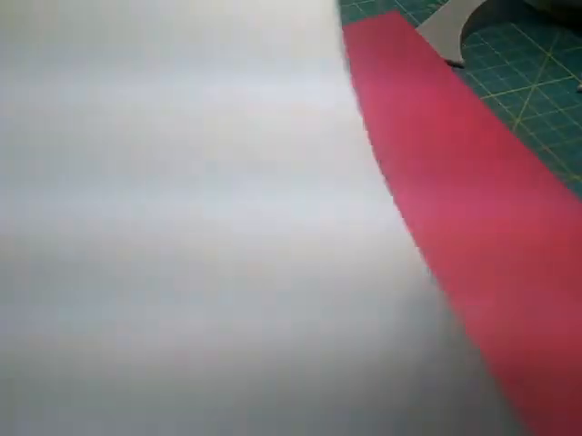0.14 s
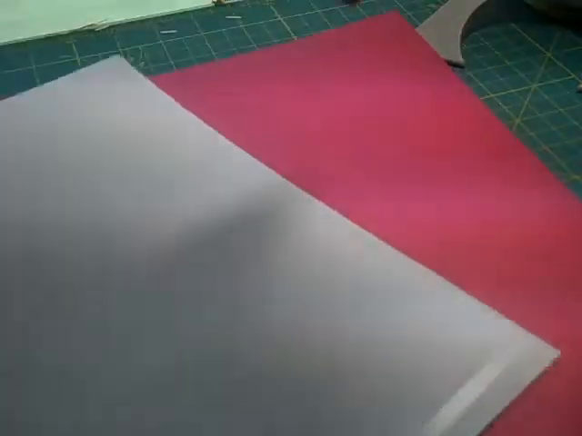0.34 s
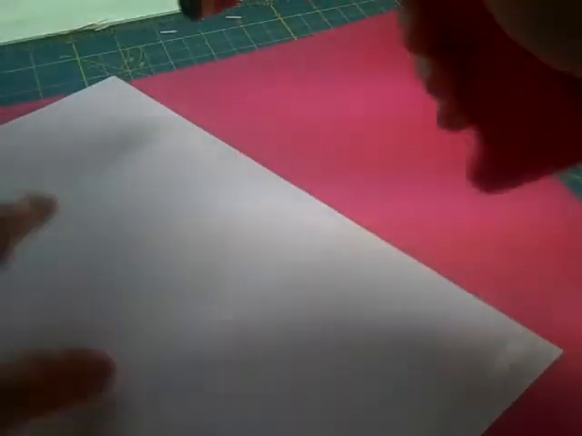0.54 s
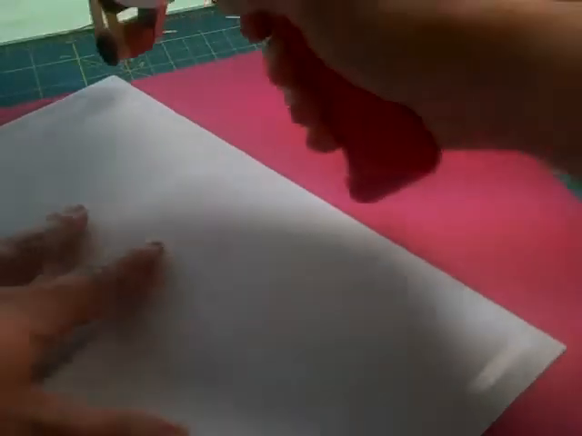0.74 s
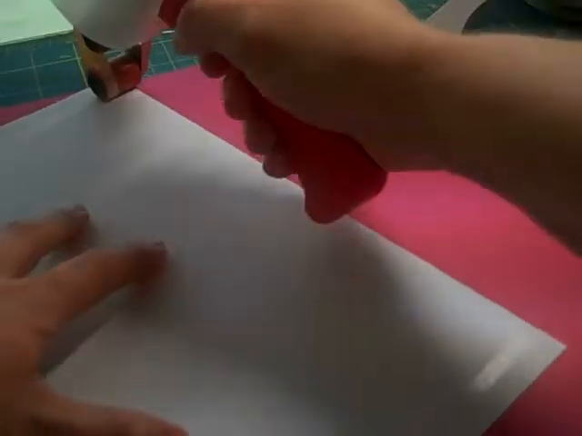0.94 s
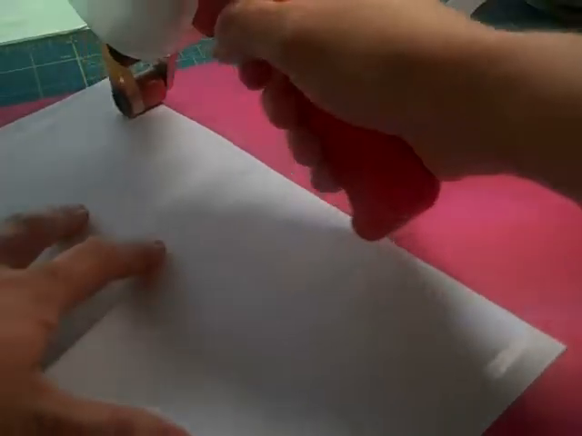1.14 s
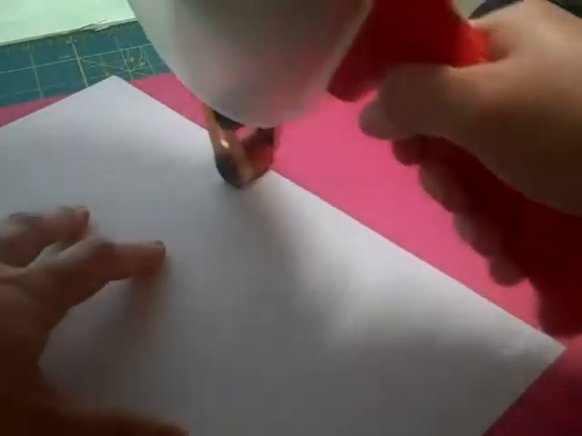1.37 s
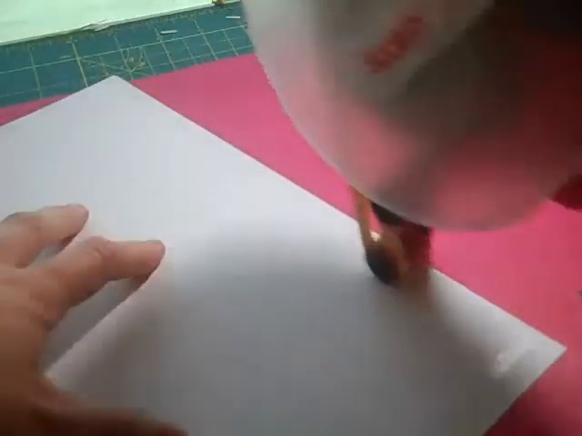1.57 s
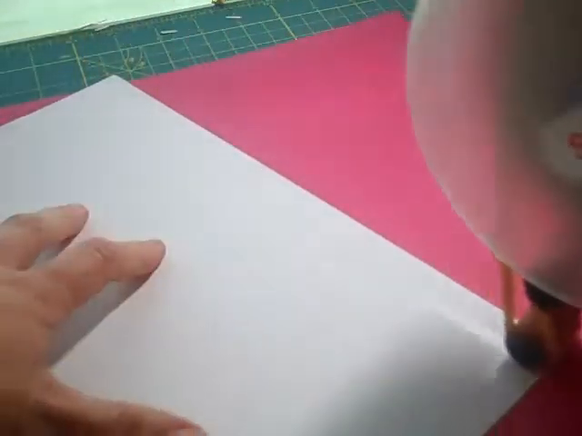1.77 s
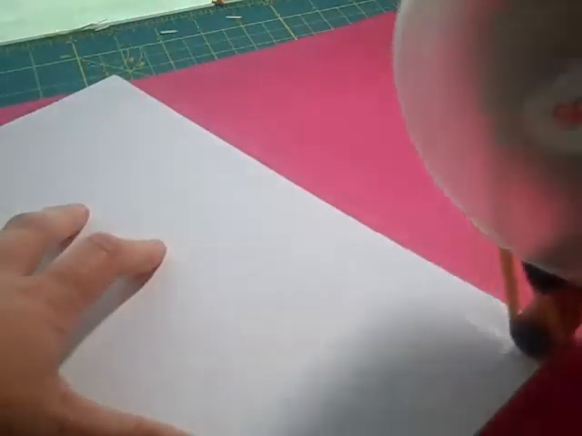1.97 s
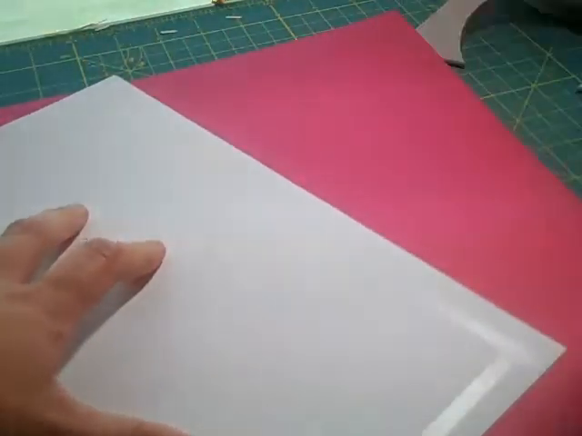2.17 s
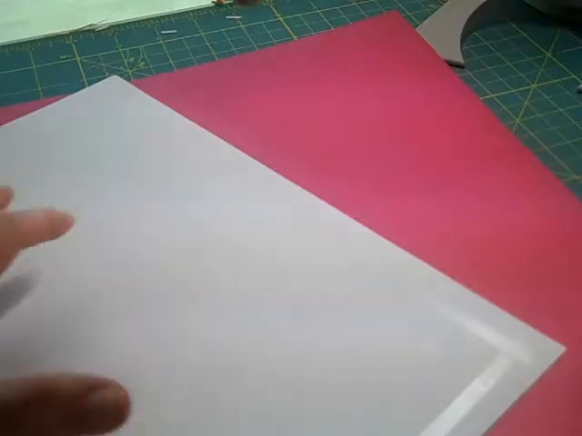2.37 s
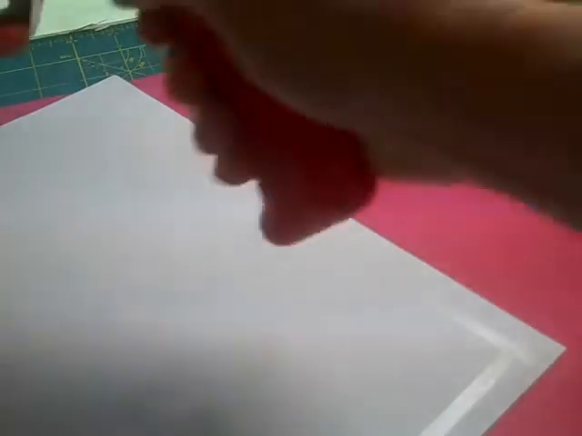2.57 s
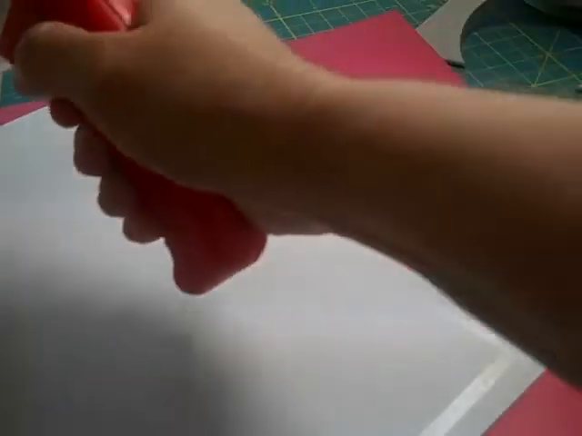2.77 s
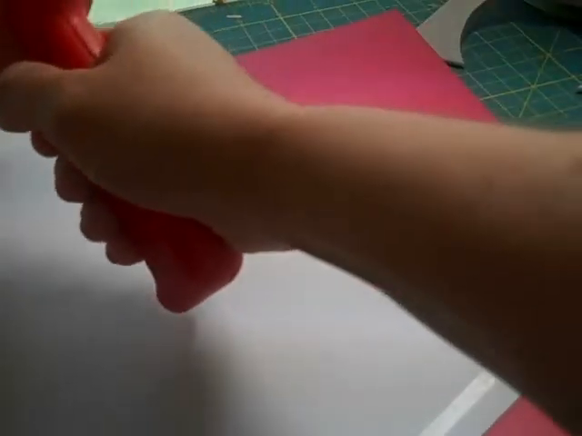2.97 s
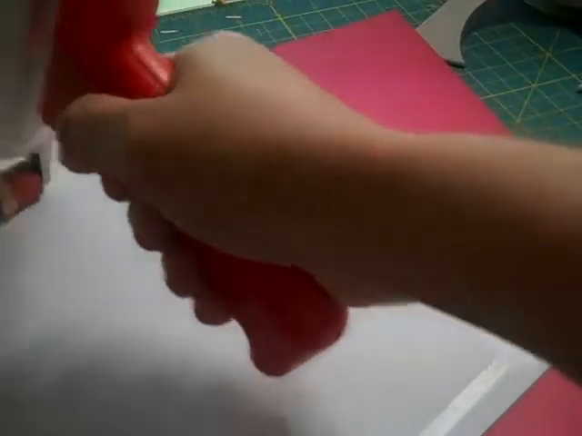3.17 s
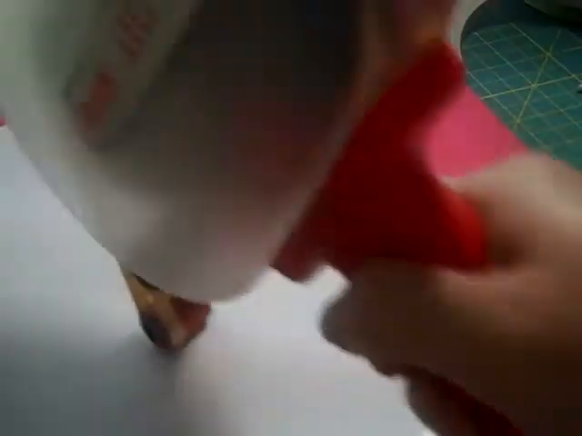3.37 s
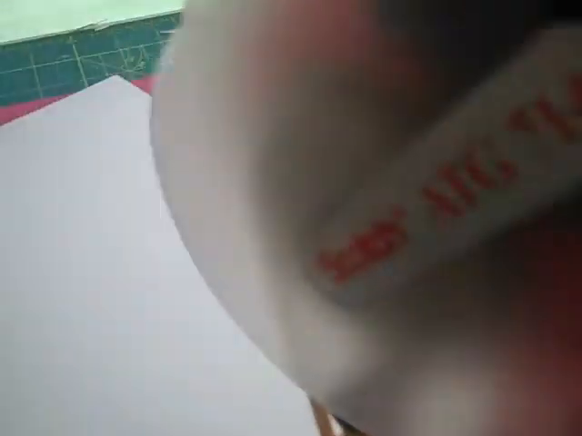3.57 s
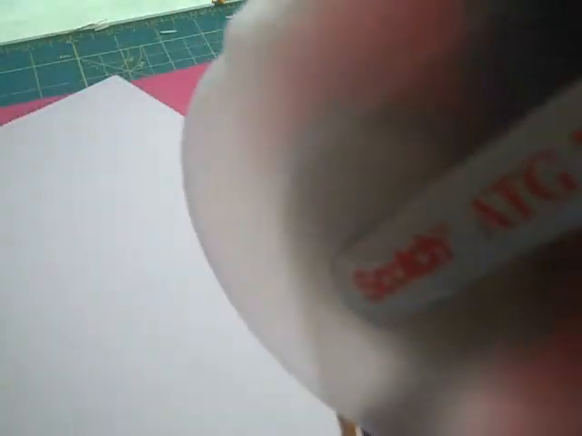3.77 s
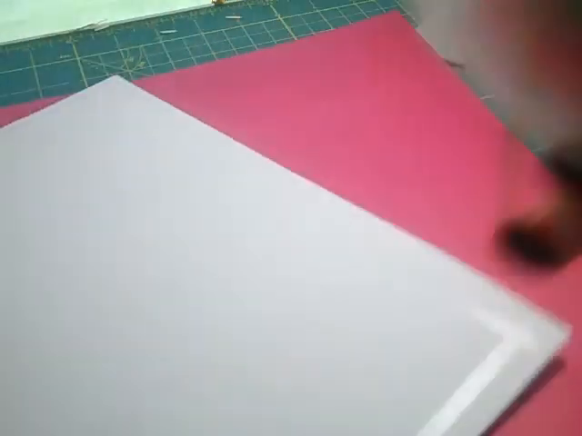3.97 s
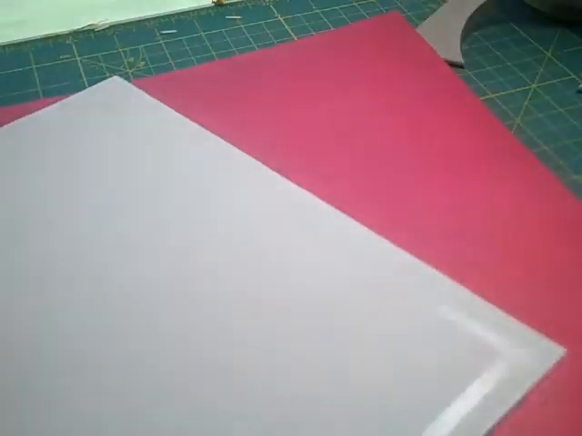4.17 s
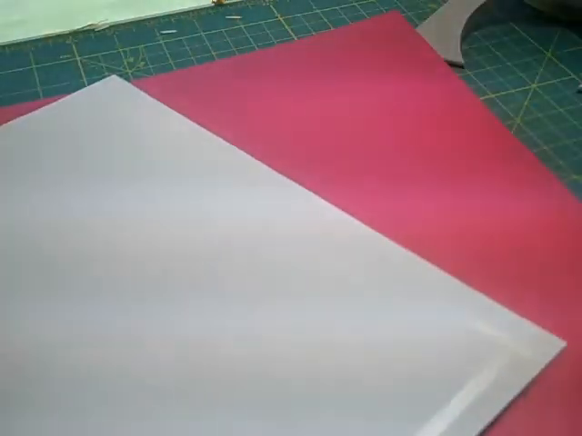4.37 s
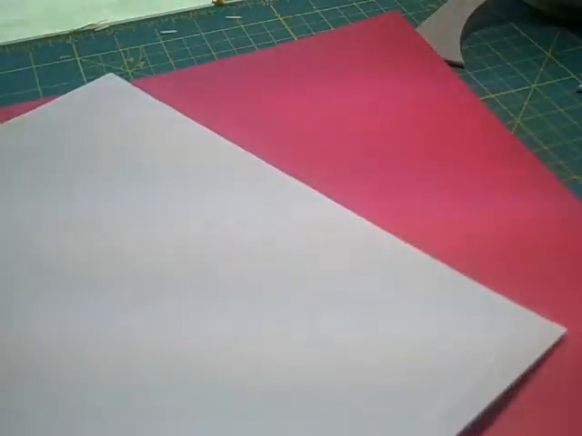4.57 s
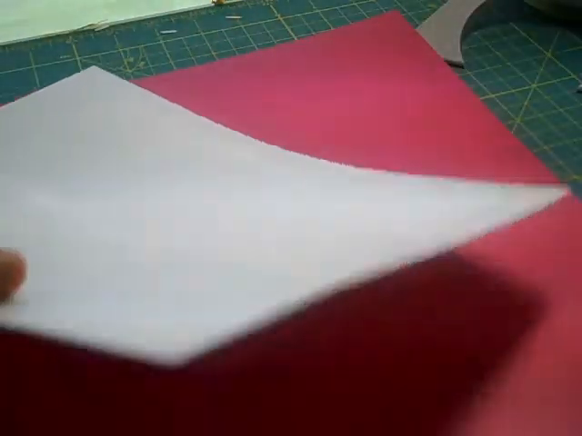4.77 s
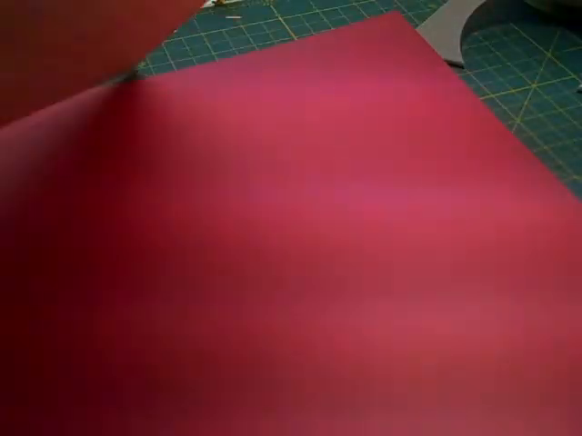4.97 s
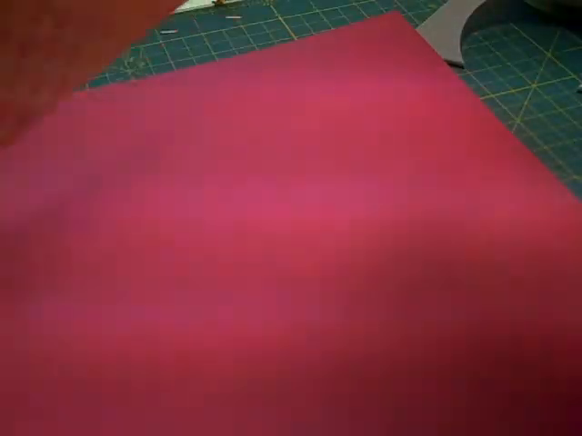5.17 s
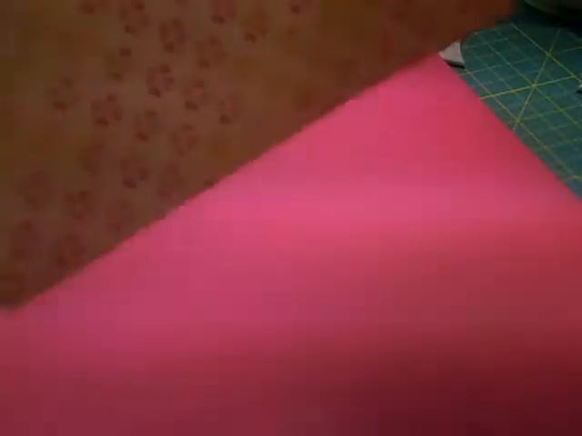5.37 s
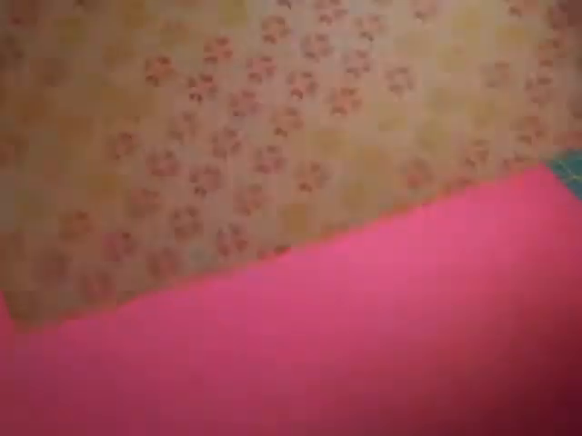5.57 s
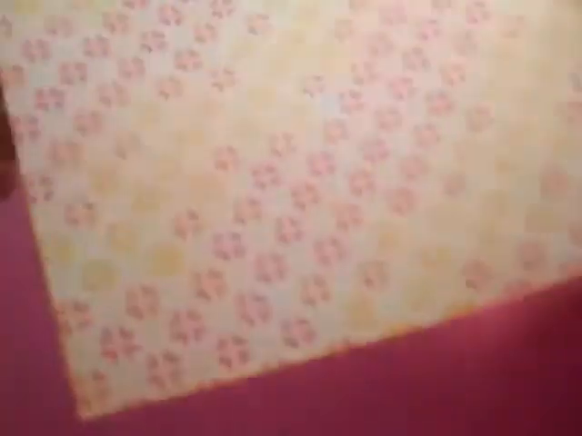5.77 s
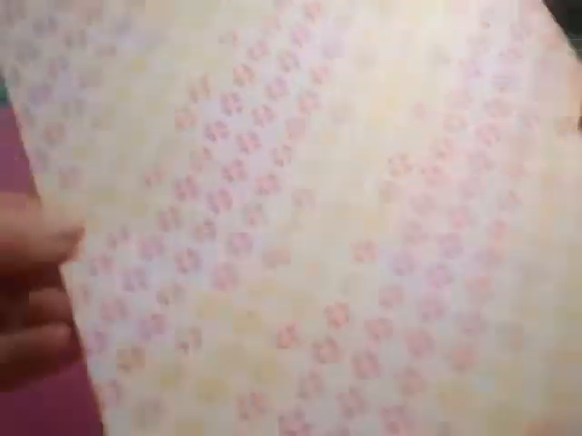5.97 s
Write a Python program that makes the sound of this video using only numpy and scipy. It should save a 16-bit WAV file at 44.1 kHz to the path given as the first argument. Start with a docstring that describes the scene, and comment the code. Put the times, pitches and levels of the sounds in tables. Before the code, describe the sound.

Two short strokes of a handheld tape applicator across paper are heard close up at a craft table. Each starts with a soft thud and trigger creak, rumbles and hisses as glue peels, and stops with a high squeal followed by plastic rattling. The paper slides and snaps before the strokes, then flexes and snaps louder after them. The small room is quiet apart from a faint, distant appliance hum.

```python
"""A craft table in a small quiet room, heard close up on a camera's stereo microphone.
A handheld tape applicator is set down on a paper sheet and rolled along two edges. Its roller
rumbles, the glue peels with a hiss, trigger and spool stick and slip, the plastic body rattles.
Around the strokes the sheet slides, flexes and snaps, and soft blows thud on the table top.
Behind it all lie the room's hush and a far-off appliance."""
import sys
import numpy as np
from scipy import signal
from scipy.fft import rfft, irfft, next_fast_len
from scipy.io import wavfile
from scipy.ndimage import uniform_filter1d, map_coordinates

SR = 44100
rng = np.random.default_rng(int(sys.argv[2]) if len(sys.argv) > 2 else 0)


def int16_out(signal):
    """Quantize to a 16-bit WAV file."""
    q = np.round(np.clip(np.atleast_2d(signal).T, -1, 1) * 32767)
    wavfile.write(sys.argv[1], SR, q.astype(np.int16))


N = 265922

# left-right likeness of close sources: frequency_hz, correlation
NEAR = [(60, .85), (300, 1), (1400, 0.94), (3100, 0.79), (6800, 0.032), (15000, 0.068)]


def amp(db):
    """Gain of a level in dB."""
    return 10 ** (np.asarray(db) / 20)


def unit(x):
    """x at rms 1."""
    return x / np.sqrt(np.mean(x ** 2) + 1e-20)


def along(points, hz):
    """Read (frequency_hz, value) points on a log frequency axis."""
    f, v = np.transpose(points)
    return np.interp(np.log(hz + 1), np.log(f + 1), v)


def filtered(x, response):
    """x shaped by a gain that depends on frequency."""
    m = next_fast_len(x.shape[-1] + 8192)
    return irfft(rfft(x, m) * response(np.fft.rfftfreq(m, 1 / SR)), m)[..., :x.shape[-1]]


def wobble(rate):
    """A smooth random curve, rate knots a second (400 at most)."""
    knots = rng.standard_normal(int(N * 400 / SR) + 4)
    return map_coordinates(knots, [np.arange(N) * min(rate, 400) / SR])


def rush(spectrum, likeness, grain_db=0, rate=1, patchy_db=3.5):
    """Stereo noise of rms 1, broken into uneven grains and patches before it is coloured."""
    grains = rng.standard_normal((2, N)) * amp(grain_db * wobble(rate))
    cells = signal.stft(grains, nperseg=512)[2]
    patches = uniform_filter1d(rng.standard_normal(cells.shape[1:]), size=3, axis=0)
    patches = uniform_filter1d(patches, size=5, axis=1)
    pair = signal.istft(cells * amp(patchy_db * unit(patches)), nperseg=512)[1][:, :N]

    def mid_side_gains(hz):
        angle = np.arccos(np.clip(along(likeness, hz), -1, 1)) / 2
        return amp(along(spectrum, hz)) * [np.cos(angle), np.sin(angle)]

    mid, side = filtered(pair, mid_side_gains)
    return unit(np.array([mid + side, mid - side]))


def swells(rows, extra_db=0):
    """Gain of movements that rise, hold and fall, 20 dB per rise or fall time; their powers add."""
    t, power = np.arange(N) / SR, np.zeros(N)
    for (top, rise, hold, fall, db, *_), more_db in zip(rows, np.broadcast_to(extra_db, len(rows))):
        before = (top - t) / max(rise, .001)
        after = (t - top - hold) / max(fall, .001)
        power += amp(db + more_db - 20 * np.clip(np.maximum(before, after), 0, 6)) ** 2
    return np.sqrt(power)


def curves(events):
    """A soft gate, open during each event, then a smooth curve for each column after the time."""
    t, gate = np.arange(N) / SR, np.zeros(N)
    for rows in events:
        gate[round(rows[0][0] * SR):round(rows[-1][0] * SR) + 40] = 1
    points = sorted((row for rows in events for row in rows), key=lambda row: row[0])
    times, *columns = np.transpose(points)
    return uniform_filter1d([gate] + [np.interp(t, times, c) for c in columns], size=90, axis=1)


def bursts(rows, body, treble, crack_db, ring_db):
    """Each contact: a sharp crack, a brief ring and a dying rustle; the body dies more slowly."""
    out, t = np.zeros((2, N + SR)), np.arange(SR // 4) / SR
    body, treble = (np.pad(x, ((0, 0), (0, SR)), "wrap") for x in (body, treble))
    onset = 1 - np.exp(-t / .00012)
    crack = amp(crack_db - 60 * t / 0.0013)
    crest_db = 8  # allowance for a burst's peak above its rms
    for start, db, body_db, hz, t60 in rows:
        i = round(start * SR)
        span = np.s_[:, i:i + len(t)]
        hit = (crack + amp(-60 * t / t60)) * unit(treble[span])
        hit += amp(body_db) * (crack + amp(-60 * t / (1.2 * t60))) * unit(body[span])
        hit += amp(ring_db + max(body_db, 0) - 60 * t / (t60 / 2)) * np.sin(2 * np.pi * hz * t)
        out[span] += amp(db - crest_db) * hit * onset
    return out[:, :N]


def stick_slip(events, overtones_db, flutter_db, jitter, rasp, left_lag_us, left_db):
    """Harmonics on one pitch; rough slips make pitch and strengths unsteady, overtones most."""
    gate, hz, db, *lift_db = curves(events)
    levels = [db] + [db + lift_db[0] + overtone for overtone in overtones_db]
    phase = 2 * np.pi * np.cumsum(hz * (1 + jitter * wobble(350))) / SR
    phase = phase - np.array([[np.pi], [-np.pi]]) * hz * left_lag_us / 1e6
    tone = sum(amp(level + flutter_db * min(k, 3) ** 0.4 * wobble(220)) * np.sin(k * phase)
               for k, level in enumerate(levels, 1))
    scatter = 1 + rasp * unit(uniform_filter1d(rng.standard_normal(N), size=30))  # slip to slip
    pan = amp([[left_db / 2], [-left_db / 2]])
    return np.sqrt(2) * gate * pan * tone * scatter


def room_tone():
    """The room's steady hush and the low hum of an appliance far off."""
    # spectra of the hush and the hum: frequency_hz, density_db
    hush = [(15, -33), (25, 3.5), (133, -4), (178, -5.5), (252, -5), (416, -7.5), (588, -15.5), (671, -14),
            (1890, -21), (3670, -23.5), (5180, -23.5), (5610, -28), (6070, -16), (8810, -27.5),
            (14200, -35.5), (14700, -120)]
    hum = [(40, -26), (57, 5.5), (75, -31), (110, -24.5), (124, -8), (140, -29), (200, -86)]
    # left-right likeness of distant sound: frequency_hz, correlation
    far = [(60, .6), (600, 0.21), (3000, 0.14), (7000, .02)]
    return (amp(-51.5) * rush(hush, far, grain_db=2.6, rate=10, patchy_db=1.8)
            + amp(-59.0) * rush(hum, far, grain_db=-0.3, rate=5.4, patchy_db=-1.5))


def paper():
    """The sheet booms softly as it bends, hisses as it slides and snaps where it buckles."""
    # bends: top_s, rise_s, hold_s, fall_s, level_db
    flexes = [(0, .01, 0, 0.05, -15), (.05, .02, 0.011, 0.36, -43), (.168, .05, 0, 0.091, -44.5),
              (.366, 0.0098, 0.016, 0.048, -29), (.47, 0.033, 0.05, 0.11, -53),
              (.584, 0.018, 0.016, 0.045, -43), (.649, .004, 0, 0.061, -45),
              (.818, 0.023, 0.0062, .05, -64), (2.386, .06, 0, 0.089, -63), (4.12, .02, 0.0048, .2, -49),
              (4.242, .03, 0, 0.035, -50), (4.586, 0.043, 0.0024, 0.032, -51.5),
              (4.655, .008, 0.0023, .12, -35.5), (4.818, .06, 0, 0.12, -43),
              (5.02, 0.3, 0.11, 0.092, -54.5), (5.124, .006, 0.0066, 0.1, -41.5),
              (5.478, 0.058, 0, 0.025, -46), (5.52, 0.023, 0.036, .06, -39.5),
              (5.568, 0.02, 0.011, 0.036, -19.5), (5.594, 0.0076, 0.016, 0.014, -19),
              (5.63, 0.033, 0.012, .03, -28.5), (5.658, 0.0044, 0.0032, .04, -21),
              (5.74, 0.11, 0, 0.092, -36.5), (5.842, 0.029, .03, 0.07, -36), (6.03, 0.14, 0.025, .1, -47.5)]
    # slides: top_s, rise_s, hold_s, fall_s, level_db, lower_treble_share
    slides = [(.026, 0.048, 0, 0.024, -27, 0), (.078, 0.072, 0.011, 0.097, -32, 0.16),
              (0.224, .15, 0.23, .05, -39, 0.26), (.37, 0.015, 0, 0.018, -18.5, 0.27),
              (0.421, 0.095, .02, .04, -35.5, 0.43), (0.459, .02, 0.022, 0.051, -28.5, 0.12),
              (0.648, .003, 0.012, 0.028, -43, 1), (0.795, 0.0018, .03, 0.019, -37.5, 0.15),
              (0.952, 0.029, 0.01, .05, -56, 0.23), (2.345, 0.0092, .05, 0.034, -48, 0.04),
              (2.739, .03, 0.042, 0.13, -54.5, 0.37), (4.12, .02, 0.27, .1, -57, 0.05),
              (4.455, .06, 0.085, 0.027, -52, 0.26), (4.652, 0.0089, .27, 0.068, -41.5, 0.46),
              (5.058, 0.072, 0.033, .03, -38.5, 0.38), (5.282, 0.14, 0.023, 0.091, -58.5, 0.12),
              (5.517, 0.016, 0.0076, .03, -43.5, 0.65), (5.544, 0.023, 0.019, .03, -43, 0.2),
              (5.637, .04, 0.04, .04, -30.5, 0.33), (5.757, 0.11, 0.032, 0.09, -43.5, .4),
              (5.84, 0.029, 0, 0.096, -34, 0.06), (6.03, 0.28, 0, 0.14, -50, 0.63)]
    # snaps, knocks and ticks: start_s, level_db, body_above_treble_db, ring_hz, t60_s
    snaps = [(.0034, -25.5, 8, 780, .07), (.0134, -28.5, 4.5, 830, 0.11), (.3646, -11, -1, 7250, 0.018),
             (.3844, -21, 1, 1420, 0.076), (.404, -21.5, -6, 6300, .035), (.5826, -40.5, 8.5, 980, 0.044),
             (.6065, -40.5, 3, 640, 0.073), (.6484, -23.5, 8.5, 2330, 0.018),
             (.7866, -24, -26, 2830, 0.013), (.7996, -20, -40, 6040, 0.0074),
             (2.3406, -32, -16, 8070, .011), (2.369, -31, -24, 5870, .012),
             (2.7229, -22, -22, 7760, 0.0063), (2.7448, -26, -23, 6000, .008),
             (2.7613, -34, -17, 6540, .012), (2.7744, -34, -29, 4380, .012),
             (4.6544, -33, 2.5, 1360, 0.048), (5.435, -35.5, -5, 2510, 0.017),
             (5.5154, -13.5, -6, 7930, 0.013), (5.5428, -18.5, 0, 6100, .01),
             (5.5684, -45.5, 22.5, 800, 0.037), (5.5934, -46, 19, 754, 0.032), (5.6526, 5, -5, 1570, 0.014),
             (5.6562, -5.5, 8.5, 1067, 0.03), (5.67, -24.5, 11.5, 900, 0.025),
             (5.7523, -16.5, -2.5, 1070, 0.017), (5.8384, -2, -10, 7440, 0.017),
             (5.8894, -27, -9, 6300, 0.017)]
    # spectra of bending, sliding and snapping: frequency_hz, density_db
    boom = [(29, -28), (50, -7), (288, -0.5), (471, -5.5), (863, -2.5), (1260, -10.5), (1360, -28.5),
            (1770, -24), (1990, -80), (2500, -39), (3250, -61), (5500, -120)]
    lower_hiss = [(1000, -21), (1800, -6), (2900, -3), (4200, -7.5), (6000, -6.5), (9000, -52)]
    upper_hiss = [(2240, -55), (3800, -8.5), (4930, -8), (5660, 2.5), (6880, 2.5), (7860, 6.5),
                  (10400, -13), (13700, -22), (14300, -17), (14700, -120)]
    snap_body = [(88, -37.5), (150, -18.5), (319, 1.5), (516, -42), (824, -9.5), (1620, -2), (2130, -9),
                 (2650, -7.5), (4000, -15), (5200, -42), (8800, -120)]
    snap_treble = [(1180, -48), (2000, -42.5), (2640, -8.5), (3520, -21.5), (3890, -3), (4240, -34),
                   (4570, -2.5), (7770, 5), (9120, -7), (13300, -26), (15000, -23)]
    share = np.clip([row[-1] for row in slides], .001, .999)
    sliding = swells(slides, 10 * np.log10(share)) * rush(lower_hiss, NEAR, grain_db=2.0, rate=180)
    sliding += swells(slides, 10 * np.log10(1 - share)) * rush(upper_hiss, NEAR, grain_db=1.5, rate=190)
    bending = swells(flexes) * rush(boom, NEAR, grain_db=3.5, rate=82)
    snapping = bursts(snaps, rush(snap_body, NEAR), rush(snap_treble, NEAR), crack_db=-8.5, ring_db=2.5)
    return bending + sliding + snapping


def edge_swish():
    """An edge of the sheet swishes past: a narrow band of noise around a moving pitch."""
    # one curve a swish: time_s, level_db, pitch_hz
    swishes = [
        [(0.0, -38, 7730), (0.03, -21, 7660), (0.04, -44, 7670)],
        [(5.02, -68, 5830), (5.056, -33, 5680), (5.1, -43, 5800), (5.12, -63, 6040)],
    ]
    gate, db, hz = curves(swishes)
    band = filtered(rng.standard_normal((2, N)), lambda f: 1 / (1 + (f / 380) ** 4))
    return gate * amp(db) * unit(band * np.sin(2 * np.pi * np.cumsum(hz) / SR))


def table_thuds():
    """A soft blow gives a few cycles of the table top."""
    # blows: start_s, level_db, pitch_hz, t60_s
    thuds = [(0.002, -18, 327, 0.043), (0.17, -30.5, 226, 0.087), (0.814, -41, 106, 0.16),
             (1.079, -18.5, 99, 0.14), (1.104, -16, 71, 0.1), (1.979, -33, 133, 0.12),
             (2.202, -15, 306, 0.027), (2.394, -34, 127, 0.058), (3.051, -13.5, 104.8, 0.12),
             (3.081, -6, 63, 0.041), (4.654, -32.5, 51.7, 0.058), (4.683, -29, 80.7, 0.062),
             (5.126, -30, 430, 0.11), (5.56, -19, 310, 0.12), (5.654, -15.5, 240.5, 0.13),
             (5.122, -27, 95, 0.068), (5.468, -35, 61.9, 0.076)]
    out, t = np.zeros(N + SR), np.arange(SR // 2) / SR
    onset = 1 - np.exp(-t / 0.0021)
    for start, db, hz, t60 in thuds:
        out[round(start * SR):][:len(t)] -= amp(db - 60 * t / t60) * np.sin(2 * np.pi * hz * t) * onset
    return out[:N]


def applicator_rattle():
    """Loose plastic chatters and clicks when the tool is lifted, turned and put down."""
    # movements of the tool: top_s, rise_s, hold_s, fall_s, body_db, treble_above_body_db
    handling = [(1.084, 0.0089, 0.026, 0.063, -28, -8), (2.08, 0.032, 0.009, .03, -39, 13.5),
                (2.105, 0.036, 0, 0.04, -30.5, 5), (2.19, 0.07, 0.0072, 0.026, -44.5, 12.5),
                (2.203, 0.013, 0.011, 0.054, -41, -5), (2.495, 0.0047, 0.0012, 0.055, -30.5, -5),
                (2.516, 0.024, 0, 0.064, -26.5, -14), (3.059, .015, 0.0055, .04, -41, 8),
                (3.069, 0.01, 0.0039, 0.038, -32, -21), (3.086, .008, 0.0034, 0.054, -23, -14),
                (3.92, 0.02, 0, 0.028, -42.5, -15), (3.97, 0.018, 0.0011, 0.052, -37.5, -15),
                (4.044, 0.097, 0, .07, -42, 10), (4.242, .04, .02, 0.011, -58.5, 4)]
    # plastic clicks, plus two ticks at 1.32 and 1.36 s from paper crackling under the roller: start_s,
    # level_db, body_above_treble_db, ring_hz
    clicks = [(1.0835, -18.5, -20, 1030), (1.3186, -23.5, -24, 7900), (1.3625, -19.5, -28, 8200),
              (1.5594, -16, -13, 1220), (1.851, -19, -17, 8100), (1.8602, -16, -22, 6370),
              (2.0206, -25, -17, 7100), (2.0524, -20.5, 0, 1240), (2.0726, -13.5, -29, 1222),
              (2.0971, -23, -29, 1120), (2.151, -25, -12, 5870), (2.162, -29, -25, 6200),
              (2.1702, -14, -35, 6300), (2.175, -19, -26, 2800), (2.183, -11, -15, 5840),
              (2.1896, -16.5, -32, 7900), (2.4599, -35.5, -4, 1040), (2.4932, -29.5, 7.5, 2220),
              (2.506, -14, -14, 6330), (2.5156, -13.5, -13, 1610), (2.5341, -22, 2.5, 1710),
              (3.0595, -16.5, -12, 6470), (3.5461, -9, -4, 1550), (3.7305, -15.5, -14, 4630),
              (3.914, -19.5, -20, 1690), (3.9685, -24, -20, 2850), (4, -31, 3, 5500),
              (4.036, -10.5, -11, 7770), (4.046, -17, -9.5, 5630), (4.0556, -20, -22, 1710),
              (4.0765, -23, -30, 8520), (4.2361, -27, -11, 1060)]
    # spectra of the housing and its loose parts: frequency_hz, density_db
    shell = [(59, -54.5), (100, -1), (538, -3.5), (755, 4), (1040, -7.5), (1690, -2.5), (1940, -6.5),
             (2480, -14.5), (3220, -10.5), (3540, -23.5), (4000, -23), (5200, -61.5), (8800, -120)]
    chatter = [(1470, -14), (2500, -4.5), (3180, -4), (4380, -9.5), (5790, -3), (7470, -1), (9780, -14),
               (10400, -21.5), (14300, -27), (15000, -80.5)]
    treble_db = [row[-1] for row in handling]
    body = swells(handling) * rush(shell, NEAR, grain_db=2.5, rate=150)
    treble = swells(handling, treble_db) * rush(chatter, NEAR, grain_db=5.0, rate=190)
    contacts = [(*row, 0.035) for row in clicks]  # adds t60_s
    clicking = bursts(contacts, rush(shell, NEAR), rush(chatter, NEAR), crack_db=-1.5, ring_db=4)
    return body + treble + clicking


def tape_strokes():
    """The roller rumbles through the housing while the glue tears off in fine grains and crackles."""
    # one curve a stroke: time_s, rumble_db, hiss_above_rumble_db
    strokes = [
        [(1.135, -28, -23), (1.163, -38.5, 11), (1.2, -40.5, -1), (1.3, -41.5, 2.5), (1.4, -33, -1.5),
         (1.52, -33.5, -0.5), (1.68, -29, 0), (1.8, -30, -5.5), (1.88, -38, 1), (1.916, -44, 6.5),
         (1.93, -43.5, 0)],
        [(3.125, -38.5, -22), (3.147, -40.5, 4), (3.173, -38.5, 14), (3.24, -44, 3), (3.294, -32.5, 1),
         (3.42, -28.5, -1), (3.53, -27.5, -1), (3.62, -28.5, 0.5), (3.73, -31.5, -2.5), (3.77, -36, 5),
         (3.8, -48, 7), (3.84, -41, -6)],
    ]
    # spectra of the roller and the peeling glue: frequency_hz, density_db
    roller = [(29, -45), (50, -18), (113, 1.5), (177, -7.5), (318, 1), (353, -5.5), (478, -3.5), (532, -6),
              (759, 1.5), (1080, -9), (1290, -0.5), (1950, -10.5), (2280, -10), (2540, -15.5),
              (3500, -18.5), (4550, -32.5), (7700, -120)]
    peel = [(1470, -33.5), (2500, -9), (3020, -2), (4160, -7.5), (6380, 3.5), (7020, -1.5), (7940, 5.5),
            (10900, -16.5), (13600, -18.5), (14200, -16.5), (14700, -120)]
    # each sticky thread of glue that lets go briefly lifts the hiss
    threads_per_s, thread_db, thread_t60_s = 85, -3.5, .005
    t = np.arange(SR // 50) / SR
    threads = (rng.random(N) < threads_per_s / SR) * rng.exponential(size=N)
    crackle = signal.fftconvolve(threads, amp(thread_db - 60 * t / thread_t60_s))[:N]
    hiss = unit((1 + crackle) * rush(peel, NEAR, grain_db=2.5, rate=280))
    rumble = rush(roller, NEAR, grain_db=0.5, rate=72)
    gate, rumble_db, hiss_db = curves(strokes)
    return gate * amp(rumble_db) * (rumble + amp(hiss_db) * hiss)


def trigger_creak():
    """The trigger sticks and slips with a low creak."""
    # one curve a creak: time_s, pitch_hz, level_db, overtone_lift_db
    creaks = [
        [(1.142, 1182, -32, -10), (1.175, 1167, -22, 2), (1.205, 1143, -22, -4.5), (1.233, 1144, -29, -14),
         (1.24, 1154, -36, -2)],
        [(2.072, 1090, -37, 21), (2.079, 1220, -22.5, 4), (2.09, 1217, -25.5, 8), (2.108, 1134, -36.5, 13),
         (2.112, 1120, -44, 19)],
        [(3.158, 950, -51, 6), (3.17, 1060, -30, -14), (3.175, 1119, -45, 3)],
        [(3.812, 1187, -40.5, 22), (3.822, 1142, -19.5, 0.5), (3.83, 1260, -64, 29)],
    ]
    # harmonics 2 to 12, before the lift: above_fundamental_db
    overtones = [-10.5, -14, -22, -18, -22.5, -23, -34.5, -39.5, -34, -35, -34]
    return stick_slip(creaks, overtones, flutter_db=1.8, jitter=.016, rasp=.1,
                      left_lag_us=24, left_db=-1.2)


def spool_squeaks():
    """The spool sticks and slips: it squeals as a stroke stops and grates when jerked into motion."""
    # one curve a squeal or grating: time_s, pitch_hz, level_db, overtone_lift_db
    squeals = [
        [(1.902, 2730, -41.5, 2), (1.906, 2730, -8, -5.5), (1.912, 2832, -14, 2.5), (1.918, 2773, -11.5, 3.5),
         (1.922, 2780, -29, 3.5), (1.932, 2780, -28, -1), (1.948, 2660, -41.5, -3.5)],
        [(3.754, 3446, -33, 3.5), (3.759, 3494, -19, 13.5), (3.764, 3265, -13.5, 3.5),
         (3.769, 3305, -14.5, 13.5), (3.773, 3275, -15.5, 20.5), (3.7785, 3165, -9.5, 10.5),
         (3.7805, 3070, -24, 1.5)],
        [(3.781, 2803, -17, 1.5), (3.784, 2897, -5.5, -12.5), (3.79, 2850, -7.5, -8),
         (3.808, 2810, -11.5, -6.5), (3.816, 2800, -19, -3), (3.823, 2800, -23, -2), (3.845, 2840, -37.5, 0)],
    ]
    grating = [
        [(3.132, 2650, -50, 7), (3.143, 2730, -40, 8), (3.149, 2803, -29, 6), (3.163, 2840, -39, 13),
         (3.179, 2970, -18.5, 6.5), (3.197, 2965, -46, 13), (3.222, 2840, -42.5, 4)],
    ]
    # harmonics 2 to 4, before the lift: above_fundamental_db
    overtones = [-15.5, -40.5, -53]
    # fainter slips pitched above the grating: time_s, pitch_hz, level_db
    whines = [
        [(3.148, 3800, -49), (3.164, 3870, -37), (3.172, 3840, -45)],
        [(3.18, 3130, -38), (3.2, 3270, -37), (3.214, 3280, -38.5), (3.222, 3320, -48)],
    ]
    squeal = stick_slip(squeals, overtones, flutter_db=0.34, jitter=0.0095, rasp=0.064,
                        left_lag_us=43, left_db=-0.9)
    grate = stick_slip(grating, overtones, flutter_db=5.5, jitter=0.0159, rasp=0.15,
                       left_lag_us=39, left_db=0.5)
    whine = stick_slip(whines, [], flutter_db=5.5, jitter=0.0133, rasp=.16, left_lag_us=15, left_db=7.0)
    return squeal + grate + whine


def camera_shadow(x):
    """The camera body shades the right microphone from close treble."""
    # tilt between the channels: frequency_hz, left_above_right_db
    lean = [(60, -4.5), (300, 1), (4400, -1), (8000, 5.5), (11000, 17.5), (15000, 20.5)]
    return filtered(x, lambda hz: amp(along(lean, hz) * np.array([[.3], [-.7]])))


def room_reverb(x):
    """The small room answers briefly, each frequency dying at its own speed."""
    # the room's decay: frequency_hz, t60_s
    decay = [(200, 0.14), (2000, 0.17), (10000, 0.16)]
    hz, t, cells = signal.stft(rng.standard_normal((2, SR // 2)), SR, nperseg=256)
    tail = signal.istft(cells * amp(-60 * t / along(decay, hz)[:, None]), SR, nperseg=256)[1]
    delayed = np.pad(x, ((0, 0), (200, 0)))
    return signal.fftconvolve(delayed, tail / np.linalg.norm(tail[0]), axes=1)[:, :N]


def scene():
    """Tool, sheet and table close to the microphone, the room behind them."""
    close = tape_strokes() + applicator_rattle() + paper() + edge_swish() + table_thuds()
    close = camera_shadow(close + trigger_creak() + spool_squeaks())
    return close + amp(-14.0) * room_reverb(close) + room_tone()


def record(dry):
    """The microphone rolls off the deep bass; the camera rounds off loud peaks and cuts the top treble."""
    bass_hz, ceiling, top_hz = 30, 0.9, 15563
    thinned = filtered(dry, lambda hz: hz ** 2 / (hz ** 2 + bass_hz ** 2))
    limited = thinned / (1 + np.abs(thinned / ceiling) ** 6) ** (1 / 6)
    return filtered(limited, lambda hz: np.clip((top_hz - hz) / 900, 0, 1) ** 2)


dry = scene()
out = record(dry)
int16_out(out)
```